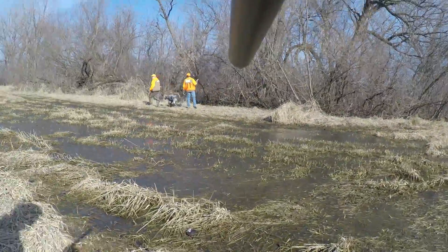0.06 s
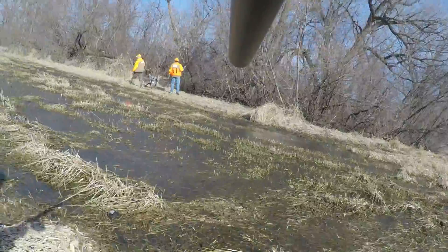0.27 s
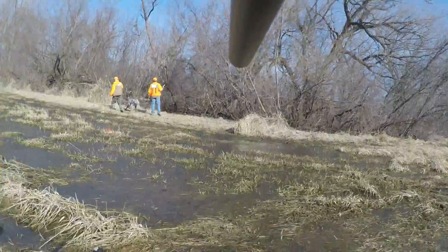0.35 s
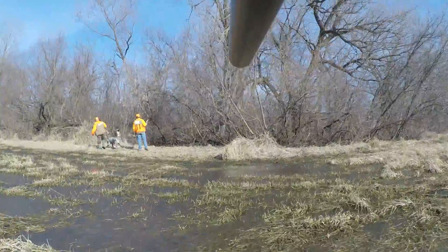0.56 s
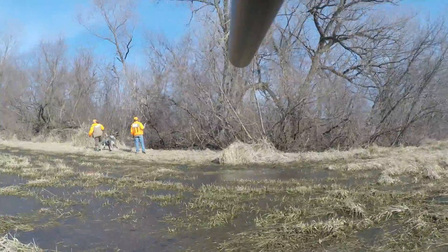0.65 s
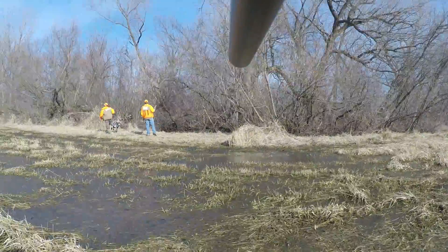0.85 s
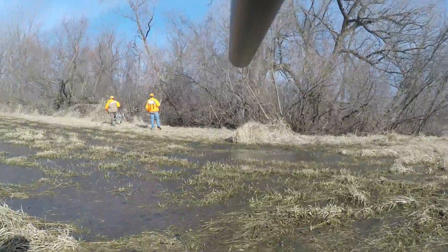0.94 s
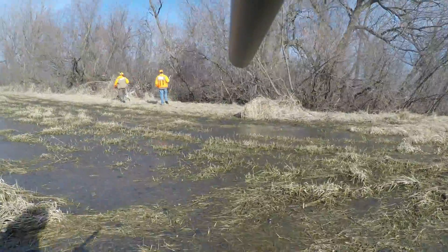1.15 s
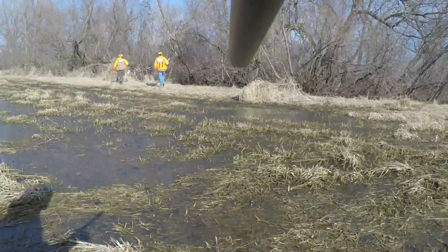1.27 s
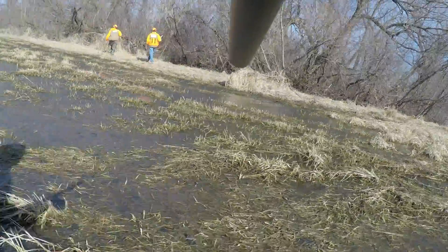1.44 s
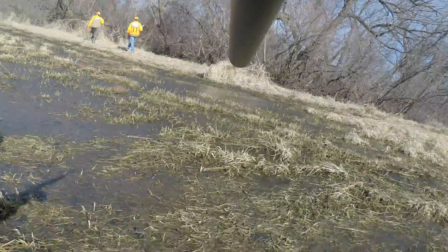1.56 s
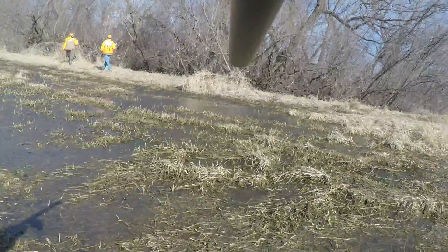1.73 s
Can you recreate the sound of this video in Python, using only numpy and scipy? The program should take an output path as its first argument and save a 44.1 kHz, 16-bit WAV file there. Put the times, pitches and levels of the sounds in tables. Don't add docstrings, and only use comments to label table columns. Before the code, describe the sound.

Dull, low rings of a carried metal tube dominate, with a hard rattling clack early on, then weaker knocks; boots swish faintly through shallow marsh water and grass, heard close through a sealed camera housing.

```python
import sys
import numpy as np
from scipy import signal
from scipy.fft import rfft, irfft
from scipy.io import wavfile

SR = 44100
rng = np.random.default_rng(int(sys.argv[2]) if len(sys.argv) > 2 else 0)


def inscribe(sig):
    pcm = np.round(np.clip(np.atleast_2d(sig).T, -1, 1) * 32767)
    wavfile.write(sys.argv[1], SR, pcm.astype(np.int16))


def voltage_ratio(level):
    return 10 ** (np.asarray(level, float) / 20)


N = 79380

# (frequency [Hz], level [dB], t60 [s],
# jolt balance [0 none, 1 middle mode, 2 lowest modes])
TUBE_MODES = [(110, -15, .22, 2), (134, -18, .12, 2), (187, -3, .23, 1), (263, 0, .18, 0),
              (354, -14, .1, 0)]
# (time [s], peak [dB], middle mode [dB], lowest modes [dB],
# share of the free ring time left by the grip [ratio])
JOLTS = [(.005, -42.5, 14.5, 10, 1.9), (0.046, -24.5, -34, -20, 0.49), (0.122, -27, 10.5, 8, 1.13),
         (0.205, -7.5, -26, -1, 0.48), (0.261, -18, -10, -14, 1.5), (.283, -18, -19, -7, 0.72),
         (0.31, -8, -26, -27, 0.98), (.329, -4.5, -23, 7.5, 0.42), (0.3325, 2, -7, -5, 0.14),
         (0.3405, 3, -13, -17, 0.094), (0.347, -31, 19, 21, 0.56), (.366, -27, 1, -6, 0.69),
         (0.386, -24, -19, 4, 1.1), (.415, -24, 1, 14.5, 0.73), (0.448, -11.5, -22, -17, 0.82),
         (.462, -26, 1, 17, 1.13), (0.511, -15, -6, 2.5, 1.06), (0.622, -26.5, 15, -4, 0.22),
         (0.632, -4, -3, -6.5, 1.05), (.71, -33, 2, 13.5, 0.47), (.763, -29, 1.5, -4, 1),
         (0.828, -19, 0.5, 3, 0.67), (0.869, -31, 4.5, 6, 1.1), (0.97, -31, -10, -1, 1.6),
         (1.016, -24.5, -12.5, -0.5, 0.34), (1.075, -31, -1.5, -2, 1.8), (1.109, -20, -28, -14, 0.59),
         (1.171, -34, -9, 1, 0.56), (1.204, -26, 0.5, 0, 0.52), (1.356, -20.5, -8, 4, 0.34),
         (1.391, -35, 0, 6, .5), (1.425, -20, -27, -15, 0.39), (1.462, -37.5, 13, 4, 1.26),
         (1.529, -42, -4, 3, 0.66), (1.633, -25, -2, -5, 0.77), (1.713, -31, 12.5, 13, 0.79)]
# (time [s], level [dB])
TREMOR_LEVEL = [(0.0, -41.5), (0.13, -40), (0.28, -32.5), (.4, -28.5), (0.48, -36), (.6, -43), (.7, -42.5),
                (0.812, -42), (.95, -44.5), (1.06, -46), (1.208, -42.5), (1.302, -51), (1.448, -31),
                (1.578, -47.5), (1.688, -43.5), (1.8, -49.5)]
# (frequency [Hz], level [dB], t60 [s])
CLAMP_MODES = [(451, 5, 0.018), (545.7, 2.5, 0.031), (681.3, -8, 0.064), (802, -7.5, 0.039),
               (1160, 3, 0.014), (1334, -10.5, 0.0095), (1620, -2, 0.018), (1780, -9.5, 0.041),
               (1977, 2, 0.017), (2460, -4, 0.0039), (3330, 5.5, 0.003), (3812, -3, 0.015),
               (4840, -1, 0.0035), (5680, 3.5, 0.0067)]
# (time [s], peak [dB], centre of the colour [Hz], rattle length [s],
# narrowing [dB per octave squared])
KNOCKS = [(0.035, -41.5, 634, 0.0013, 8), (0.1555, -22.5, 1980, 0.0016, 8), (0.2075, -17, 1730, 0.0011, 31),
          (0.303, -11.5, 740, 0.003, 29), (0.305, -27.5, 1900, 0.0051, 7),
          (0.3288, -4.5, 1600, 0.00073, 3.5), (.331, -15.5, 636, 0.0026, 42), (.3315, -21, 4000, 0.0022, 6),
          (0.3428, -13, 3000, 0.003, 4.5), (.344, -18, 1500, .002, 32), (0.352, -28, 1660, 0.011, 30),
          (0.373, -32, 2020, 0.0018, 15), (0.3813, -21.5, 1530, 0.00092, 5.5),
          (0.413, -34, 1880, 0.033, 14), (0.441, -25.5, 600, 0.0077, 6), (.4975, -37, 1220, 0.00078, 52),
          (0.506, -30, 690, 0.0024, 19), (0.611, -32, 1340, 0.00063, 10), (0.623, -25, 930, 0.00082, 14),
          (.6305, -19, 2090, 0.0025, 9), (0.632, -14.5, 500, 0.0055, 11), (0.636, -26, 3500, 0.0052, 7),
          (0.657, -26.5, 1400, 0.00094, 17), (.722, -29.5, 1280, 0.00058, 10),
          (0.755, -26.5, 805, 0.0076, 17), (0.81, -32.5, 1800, 0.0027, 6), (0.823, -33.5, 1880, .002, 40),
          (0.828, -33, 1800, 0.0027, 44), (0.8347, -25.5, 774, 0.0049, 11), (0.845, -38, 1940, 0.011, 34),
          (1.112, -32.5, 1010, 0.002, 27), (1.199, -42, 1090, 0.00053, 21), (1.342, -40, 1200, 0.0049, 20),
          (1.42, -32, 620, 0.012, 25), (1.454, -21.5, 1840, 0.00033, 18), (1.455, -36, 520, 0.011, 25),
          (1.499, -26, 1550, 0.0035, 70), (1.629, -27, 950, 0.0039, 17), (1.758, -44.5, 580, 0.0013, 17)]
# (time [s], rise [s], length [s], level [dB], fine spray [dB])
SWISHES = [(0.0, 0.00057, 0.026, -48.5, 6.5), (0.048, 0.04, 0.061, -49.5, 4),
           (0.14, 0.014, 0.082, -40, -3.5), (0.17, 0.022, 0.063, -56, 13.5), (0.289, 0.05, 0.1, -51.5, 7),
           (0.393, 0.06, 0.037, -50, 10.5), (0.488, 0.023, 0.13, -46.5, 5.5),
           (0.689, 0.0086, 0.057, -51, 6), (0.724, 0.011, 0.077, -47.5, -2), (0.823, 0.0081, 0.11, -59, 4),
           (0.95, 0.022, 0.28, -71.5, 3), (1.184, 0.076, 0.074, -62, 5), (1.291, 0.016, 0.016, -49, 1),
           (1.321, 0.04, 0.092, -43, -1), (1.44, 0.0082, 0.07, -55, -5), (1.533, 0.0064, 0.15, -66.5, 5)]
# (frequency [Hz], width [Hz], level [dB])
HOUSING = [(1210, 390, -10.5), (2374, 382, 3), (3330, 754, 1), (5520, 730, -3.5), (6346, 287, 1.5),
           (7180, 500, -4.5), (8760, 1170, -12.5), (10570, 620, -15.5), (12500, 830, -9.5),
           (14540, 820, -14.5)]
# (time [s], peak [dB], pitch [Hz])
DROPS = [(0.154, -44, 6260), (.196, -35.5, 2700), (0.228, -41, 3270), (0.224, -39.5, 12900),
         (0.2234, -46, 7100), (0.2594, -41, 2600), (0.415, -45.5, 12500), (.417, -47, 7160),
         (0.437, -44, 13600), (.6998, -46, 3850), (0.788, -46.5, 13300), (.778, -54, 6200),
         (0.8595, -52, 2580), (0.9108, -49.5, 2610), (1.1972, -53, 3260), (1.208, -56, 12800),
         (1.2444, -60, 2380), (1.254, -53.5, 6460), (1.459, -50.5, 11600), (1.497, -59, 9700),
         (1.5269, -40.5, 2900), (1.5291, -43.5, 3400), (1.5269, -56, 4400), (1.338, -45, 3170),
         (.815, -45, 3300), (1.527, -53, 6100)]
# (time [s], level [dB])
GUST_LEVEL = [(0.0, -48), (0.04, -40.5), (0.3, -32), (0.4, -28.5), (0.45, -40), (.53, -43), (0.6, -55),
              (0.66, -35.5), (0.766, -31.5), (0.932, -47), (0.972, -41), (1.138, -50), (1.172, -39.5),
              (1.288, -48.5), (1.322, -41.5), (1.744, -40.5), (1.8, -54)]
# (frequency [Hz], density [dB per Hz])
HISS_COLOUR = [(240, -59), (400, -22), (445, -74), (796, -18), (928, -8), (2030, 0.5), (3250, 0.5),
               (13500, -15), (15500, -8.5)]


def rms_one(x):
    return x / np.sqrt(np.mean(x ** 2) + 1e-20)


def in_time(rows):
    return np.interp(np.arange(N) / SR, *np.transpose(rows))


def drift(rate_hz):
    r = np.exp(-2 * np.pi * rate_hz / SR)
    wander = signal.lfilter([1], [1, -2 * r, r * r], rng.standard_normal(N + SR))
    return rms_one(wander[SR:])


def ring(x, hz, t60_s):
    r = voltage_ratio(-60 / (t60_s * SR))
    w = 2 * np.pi * hz / SR
    return signal.lfilter([0, np.sin(w)], [1, -2 * r * np.cos(w), r * r], x + 1e-18)


def resonance(x, hz, width_hz):
    r = np.exp(-np.pi * width_hz / SR)
    feedback = [1, -2 * r * np.cos(2 * np.pi * hz / SR), r * r]
    return signal.lfilter([(1 - r * r) / 2, 0, (r * r - 1) / 2], feedback, x)


def cut(x, hz, kind, order=2):
    return signal.sosfilt(signal.butter(order, hz, kind, fs=SR, output="sos"), x)


def bursts(times_s, gains, shapes):
    out = np.zeros(N + 2 * shapes.shape[1])
    for start, gain, shape in zip((times_s * SR).astype(int), gains, shapes):
        out[start:start + len(shape)] += gain * shape
    return out[:N]


def ring_modes(x, modes, damping=1):
    out = 0
    for k, (hz, level_db, t60_s) in enumerate(modes):
        out = out + (-1) ** k * voltage_ratio(level_db) * ring(x, hz, damping * t60_s)
    return out


def tube_jolts():
    push_s, build_up_hz, jolt_db, mount_cut_hz = 0.00053, 110, -1.5, 37
    t = np.arange(SR // 4) / SR / push_s
    push = t * np.exp(-t)
    push = push / np.sum(push)
    pushes = [resonance(push, hz, build_up_hz) for hz, *_ in TUBE_MODES]
    notes = []
    for _, _, middle_db, lowest_db, share in JOLTS:
        note = 0
        for k, (hz, level_db, t60_s, column) in enumerate(TUBE_MODES):
            gain = voltage_ratio(level_db + (0, middle_db, lowest_db)[column])
            note = note + (-1) ** k * gain * ring(pushes[k], hz, t60_s * share)
        notes.append(note)
    times_s, peaks_db = np.transpose(JOLTS)[:2]
    jolted = bursts(times_s, voltage_ratio(peaks_db + jolt_db), np.array(notes))
    return cut(jolted, mount_cut_hz, "high")


def tube_tremor():
    lumps_db, grip_damping, hum_top_hz, buzz_db = 2.5, 0.9, 324, -19
    tremor = rng.standard_normal(N) * voltage_ratio(lumps_db * drift(15.2))
    hum = ring_modes(tremor, [row[:3] for row in TUBE_MODES], grip_damping)
    hum = rms_one(cut(hum, hum_top_hz, "low", order=4))
    buzz = rms_one(ring_modes(tremor, CLAMP_MODES[:8]))
    return voltage_ratio(in_time(TREMOR_LEVEL)) * (hum + voltage_ratio(buzz_db) * buzz)


def clamp():
    knock_db, first_contact, scatter_db, lag_cycles = -6, 0.92, 0.8, 0.35
    below_centre = 0.17
    times_s, peaks_db, centre_hz, length_s, fall_db = np.transpose(KNOCKS)
    t = np.arange(1500) / SR
    rattle = rng.standard_normal((len(times_s), len(t))) * np.exp(-t / length_s[:, None])
    rattle[:, 0] = first_contact * np.sqrt(0.038 / length_s)
    energy = np.sum(rattle ** 2, axis=1)
    scatter = scatter_db * rng.standard_normal((len(times_s), len(CLAMP_MODES)))
    out = 0
    for k, (hz, level_db, t60_s) in enumerate(CLAMP_MODES):
        side = np.where(hz < centre_hz, below_centre, 1)
        colour_db = -fall_db * np.log2(hz / centre_hz) ** 2 * side
        taken = np.abs(rattle @ np.exp(2j * np.pi * hz * t)) + 0.21 * np.sqrt(energy)
        gains = voltage_ratio(peaks_db + knock_db + level_db + scatter[:, k] + colour_db) / taken
        strikes = bursts(times_s + lag_cycles / hz, gains, rattle)
        out = out + (-1) ** k * ring(resonance(strikes, hz, 0.38 * hz), hz, t60_s)
    return cut(cut(out, 7550, "low", order=3), 570, "high")


def swish():
    grains_per_s, grain_spread_db, clump_db, sheet_db, release_s = 5000, 2.5, 2, -4, 0.028
    t = np.arange(N) / SR
    sizes = voltage_ratio(grain_spread_db * np.minimum(rng.exponential(1, N), 5)) * rng.choice([-1, 1], N)
    grains = rms_one(sizes * (rng.random(N) < grains_per_s / SR))
    sheet = voltage_ratio(sheet_db) * rng.standard_normal(N)
    water = (grains + sheet) * voltage_ratio(clump_db * drift(81))
    bands = []
    for k, (hz, width_hz, level_db) in enumerate(HOUSING):
        wide_hz = 1.72 * width_hz
        band = resonance(resonance(water, hz, wide_hz), hz, wide_hz)
        bands.append((-1) ** k * voltage_ratio(level_db + 2.15 * drift(25)) * band)
    body, spray = sum(bands[:6]), sum(bands[6:])
    scale, out = np.std(body), 0
    for start_s, rise_s, length_s, level_db, spray_db in SWISHES:
        rise = np.clip((t - start_s) / rise_s, 0, 1)
        release = np.exp(-np.maximum(t - start_s - length_s, 0) / release_s)
        out = out + voltage_ratio(level_db) * rise * release * (body + voltage_ratio(spray_db) * spray) / scale
    return out


def drops():
    puff_s, drop_db, ring_cycles = 0.0016, 9.5, 15
    t, out = np.arange(700) / SR, 0
    for time_s, peak_db, hz in DROPS:
        puff = rng.standard_normal(len(t)) * np.exp(-t / puff_s)
        squeaks = peak_db < -49 and hz < 2700
        cycles = ring_cycles * (1 + 3.1 * squeaks)
        note = ring(puff, hz, cycles / hz)
        drop = note / np.abs(note).max() + 0.024 * puff
        out = out + bursts(np.array([time_s]), [voltage_ratio(peak_db + drop_db)], drop[None])
    return out


def wind():
    flutter_hz, flutter_width_hz, flutter_db = 101, 126, -8.5
    noise = rng.standard_normal((2, N + SR))
    rumble = cut(cut(noise[0], 23.7, "low"), 13, "high")[SR:]
    flutter = resonance(noise[1], flutter_hz, flutter_width_hz)
    flutter = resonance(flutter, flutter_hz, flutter_width_hz)[SR:]
    return voltage_ratio(in_time(GUST_LEVEL)) * (rms_one(rumble) + voltage_ratio(flutter_db) * rms_one(flutter))


def hiss():
    hz, density_db = np.transpose(HISS_COLOUR)
    bin_hz = np.arange(N // 2 + 1) * SR / N
    colour_db = np.interp(np.log(bin_hz + 1), np.log(hz), density_db, left=-60)
    noise = irfft(rfft(rng.standard_normal(N)) * voltage_ratio(colour_db), N)
    return voltage_ratio(-63.5) * rms_one(noise)


def scene():
    water = swish() + drops()
    metal = tube_jolts() + tube_tremor() + clamp()
    background = wind() + hiss()
    return (water + metal + background)[None]


def band_limit(x):
    return signal.sosfilt(signal.butter(12, 15770, fs=SR, output="sos"), x)


def record(dry):
    top_cut = signal.cheby2(8, 40, 15850, fs=SR, output="sos")
    mix = signal.sosfilt(top_cut, dry)
    return band_limit(mix)


dry = scene()
out = record(dry)
inscribe(out)
```